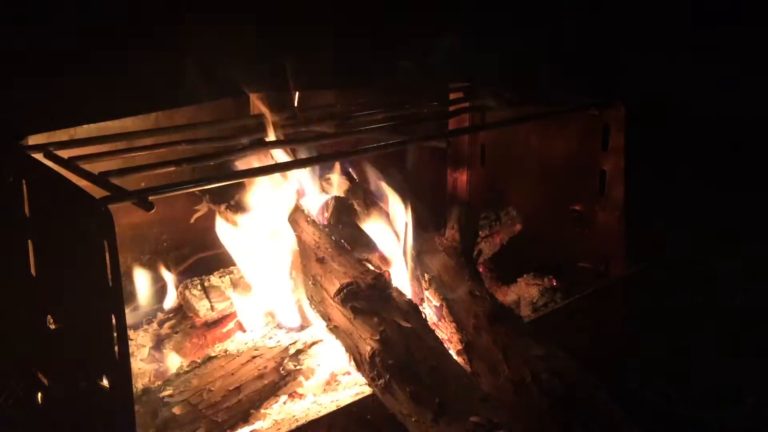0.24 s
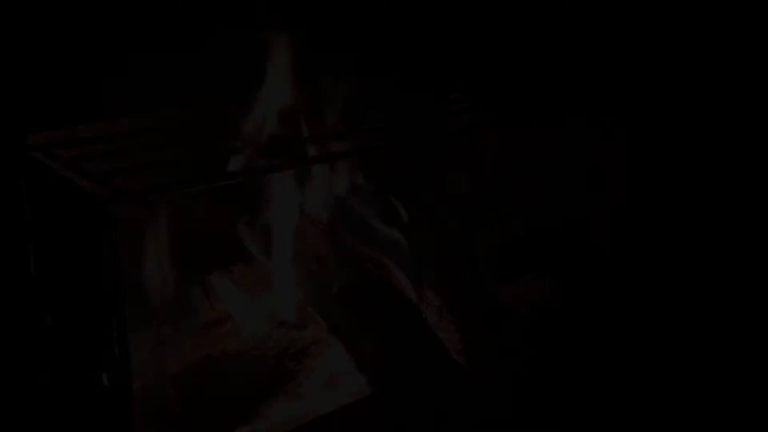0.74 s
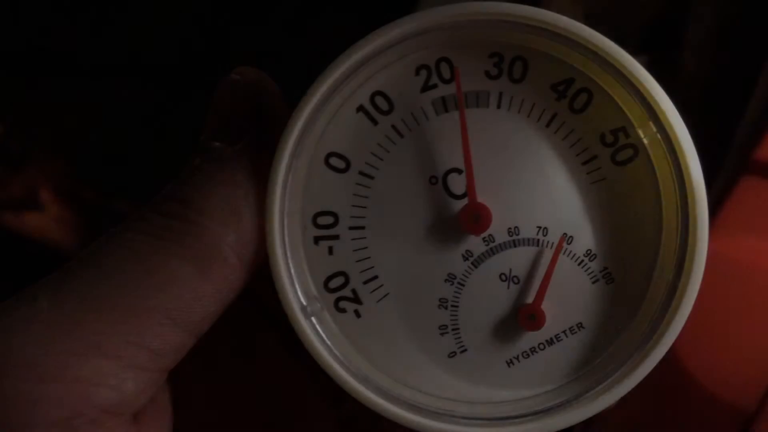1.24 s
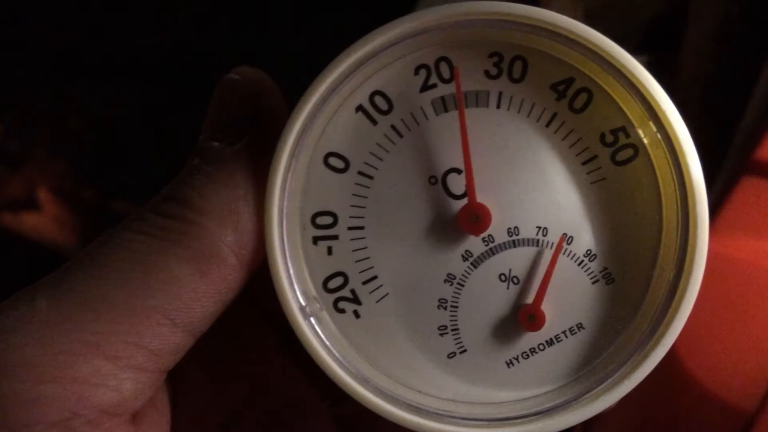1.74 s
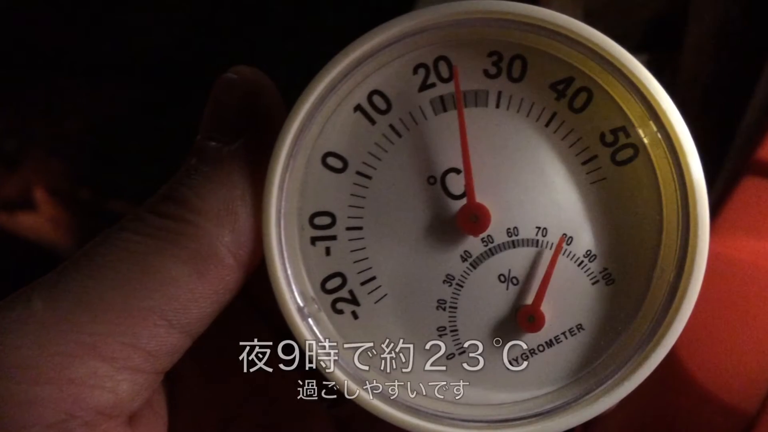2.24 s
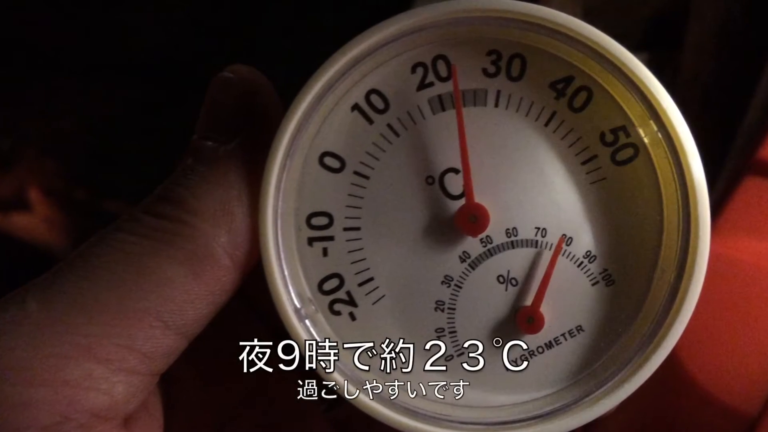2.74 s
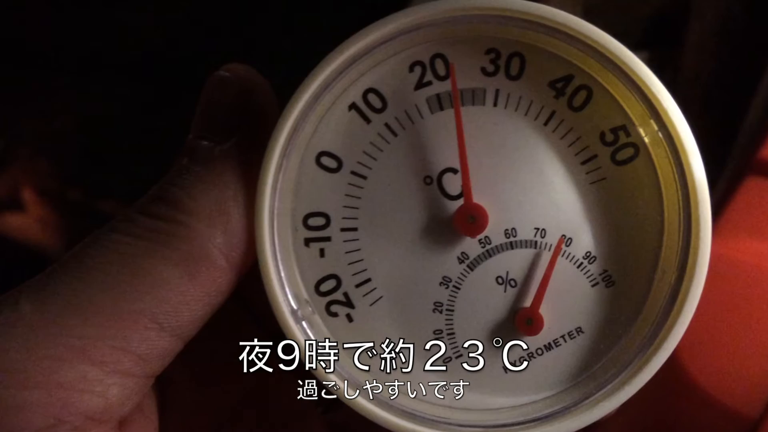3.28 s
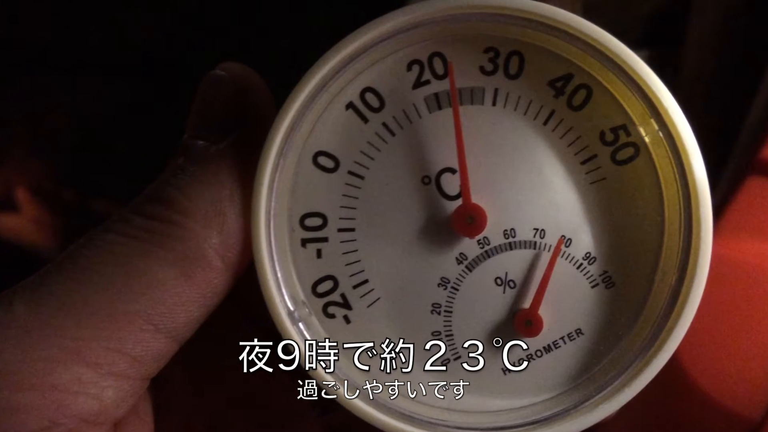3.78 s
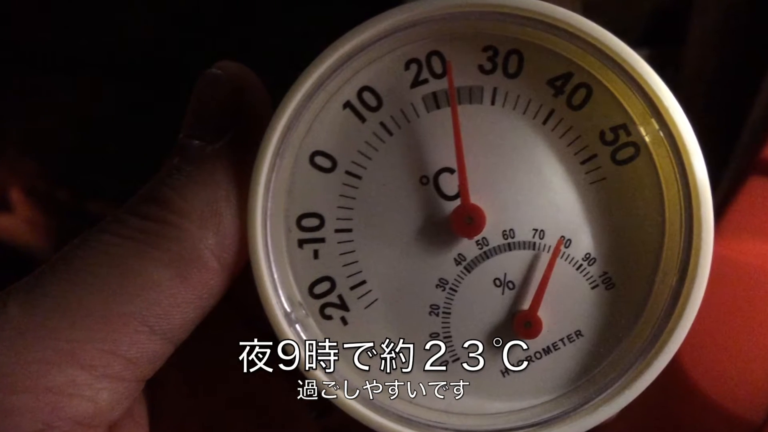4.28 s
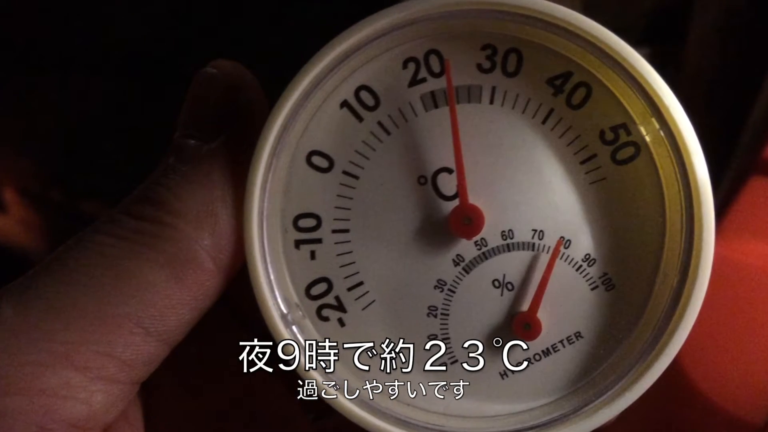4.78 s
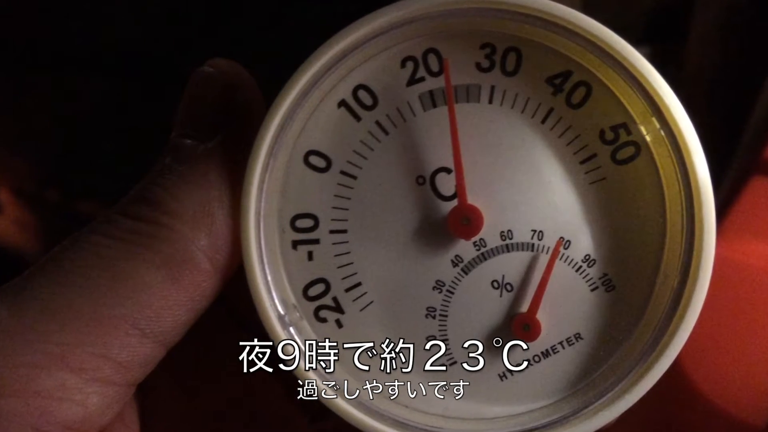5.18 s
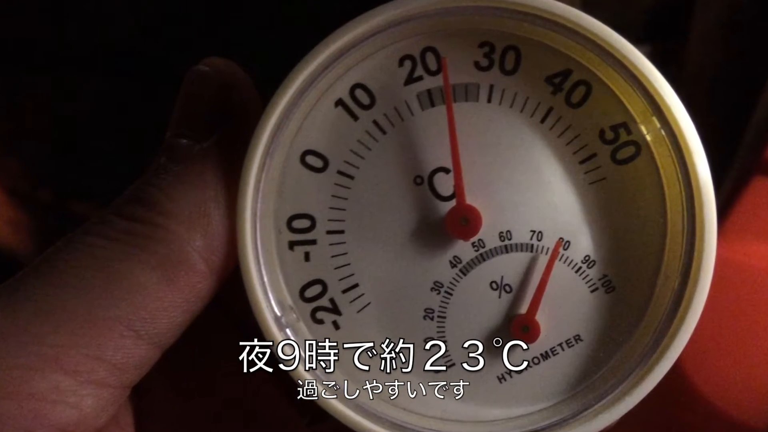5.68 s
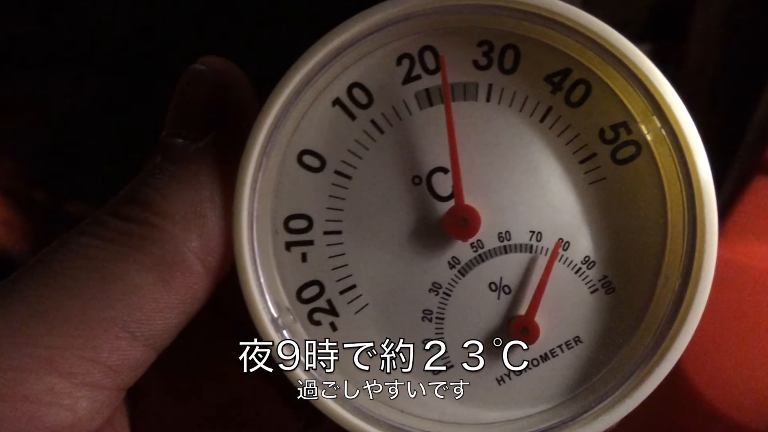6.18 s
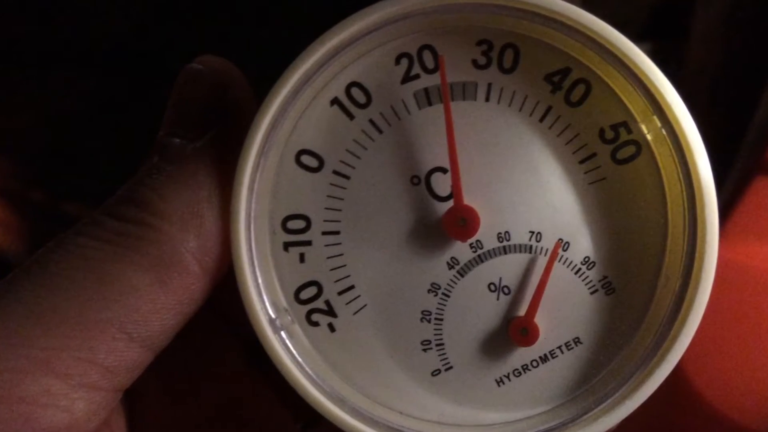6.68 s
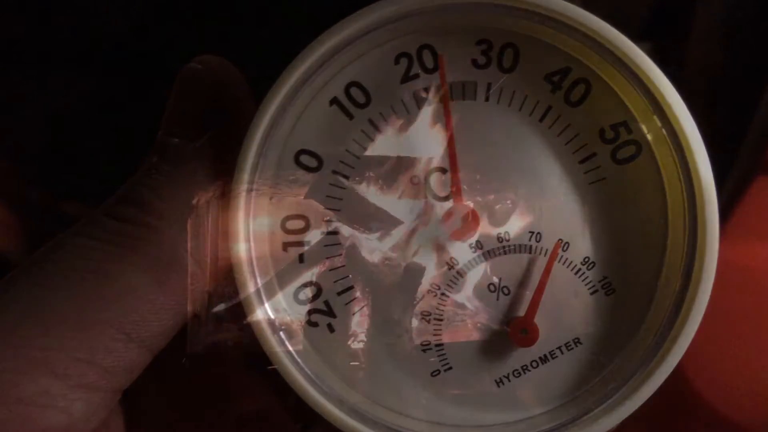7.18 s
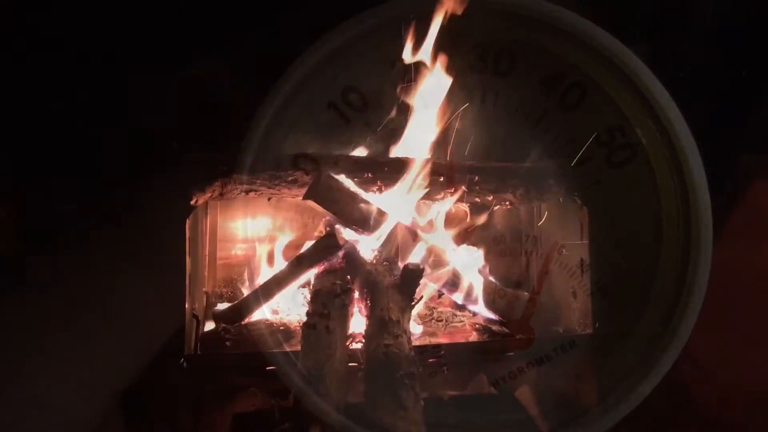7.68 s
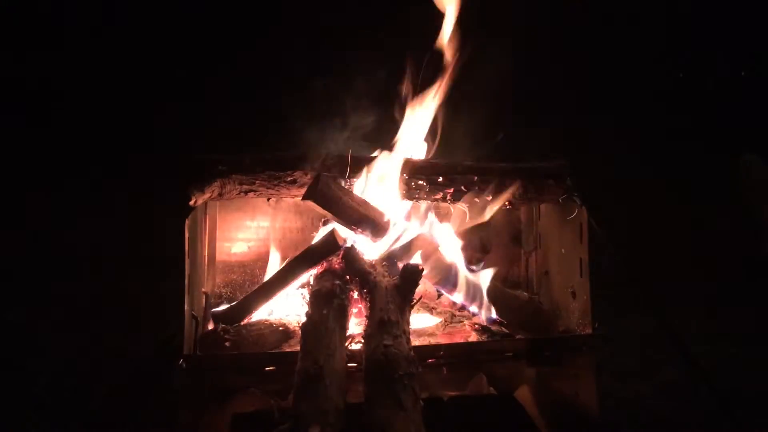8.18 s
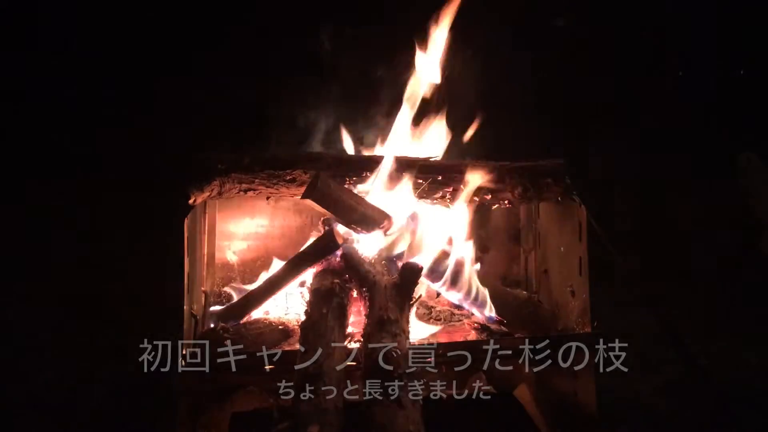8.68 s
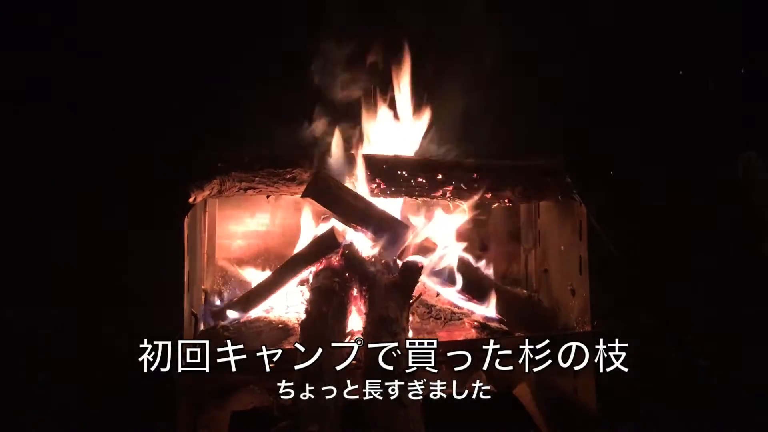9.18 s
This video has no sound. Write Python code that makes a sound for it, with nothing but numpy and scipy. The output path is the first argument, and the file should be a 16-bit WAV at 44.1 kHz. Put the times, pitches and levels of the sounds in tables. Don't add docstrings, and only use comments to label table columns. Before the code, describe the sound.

Night crickets trill in a dense high chorus with a raspy bush cricket while a wood fire rumbles softly, ticks and pops sharply in a metal grill.

```python
import sys
import numpy as np
from scipy import signal
from scipy.fft import rfft, irfft, next_fast_len
from scipy.io import wavfile
from scipy.ndimage import map_coordinates

SR = 44100
rng = np.random.default_rng(int(sys.argv[2]) if len(sys.argv) > 2 else 0)


def ratio(d):
    e = np.asarray(d, float) / 20
    return 10 ** e


def file_out(sig):
    cols = np.atleast_2d(sig).T
    lim = np.clip(cols, -1, 1)
    pcm = np.round(lim * 32767).astype(np.int16)
    wavfile.write(sys.argv[1], SR, pcm)


N = 415863
T = np.arange(N) / SR

# freq_hz, density_db_per_hz
AIR_SPECTRUM = [(1300, -23), (1750, 0.5), (2700, -12), (3700, 6), (4300, -1), (5550, -4), (6500, -9),
                (9000, -9.5), (12000, -8.5), (15500, -8.5)]
AIR_DB = -66.5

# freq_hz, density_db_per_hz
TRAFFIC_SPECTRUM = [(150, -37), (250, 0), (339, -9), (404, -4.5), (547, -2), (843, -4), (1020, 1),
                    (1360, -2), (1850, -15.5), (2600, -11.5), (3380, -27), (5720, -120)]
# time_s, peak_spacing_hz, echo_share_0_to_1
GROUND_ECHO = [(0, 305, 0), (1, 310, 0.03), (2, 353, .5), (3.2, 391, 0.22), (4, 468, 0.4), (6.5, 460, 0.26),
               (7.5, 486, 0.23), (8, 594, 0), (9.43, 590, 0)]
TRAFFIC_DB = -61.5

# time_s, level_db
FLAME_LEVEL = [(0.0, -56.5), (1.55, -59.5), (3.28, -57), (3.57, -58.5), (4.67, -58), (5.51, -56),
               (6.8, -59.5), (7.09, -55.5), (8.17, -59.5), (9.43, -60)]
# freq_hz, density_db_per_hz
FLAME_SPECTRUM = [(13, -49), (22, -30), (40, -7), (64, -0.5), (125, -2), (208, -6), (246, -12.5),
                  (333, -17), (400, -22), (520, -33), (880, -120)]

# time_s, level_db
CHORUS_LEVEL = [(0.0, -43.5), (1.02, -42.5), (1.21, -43.5), (1.86, -41), (1.94, -47), (2.1, -41.5),
                (3.28, -43), (3.47, -39.5), (3.67, -46.5), (3.86, -41), (4.59, -43.5), (4.67, -44),
                (5.62, -43.5), (7.17, -42), (7.6, -45.5), (7.8, -48), (8.28, -52), (9.43, -49.5)]
# pitch_hz, level_db, strokes_per_s, trills_per_s
FAR_SINGERS = [(4990, 1.5, 31.5, 3.1), (4955, 1, 30.2, 2.1), (4944, -0.5, 29.1, 3.3), (4960, -8.5, 40, 1.8),
               (4833, -4, 28.3, 2.45), (4970, -4, 30, 2.5), (4783, -5, 27.6, 2.2), (4714, -11, 29.7, 1.7),
               (4595, -14.5, 30, 2.7)]
# freq_hz, density_db_per_hz
MASS_SPECTRUM = [(4200, -32), (4500, -15), (4750, -1), (4900, 3), (5010, 4), (5120, -1), (5300, -13),
                 (5420, -40)]

# time_s, rasp_db, lower_re_upper_wing_db
RASP_LEVEL = [(0.0, -49, -14), (0.84, -52, -11), (1.3, -55.5, -7), (2.47, -56.5, -2.5), (5.41, -55.5, -4.5),
              (5.65, -51.5, -6), (6.04, -53, -11.5), (6.62, -49.5, -13), (7.0, -49.5, -18),
              (7.64, -50.5, -8.5), (7.85, -60, -9), (8.1, -97, 0.1), (9.43, -85, 0.1)]
# time_s, lag_ms
CYCLE_LAG = [(0, 40), (1.01, 33), (1.02, 20.5), (1.35, 17), (2.3, 12.5), (3.6, 4.5), (4.6, 6), (5.74, 2.5),
             (6.5, 5.5), (6.93, 3.5), (7.33, 6), (8, 17)]
# offset_ms, half_length_ms, level_db
RASP_STROKES = [
    (0, 3.4, 0),
    (13, 4.0, -16),
    (26, 2.3, -3.5),
    (39, 4.0, -18),
    (57, 4.5, -12),
    (67, 4.0, -14),
]
# freq_hz, density_db_per_hz
UPPER_WING = [(5600, -39), (6200, -4), (6800, 2), (7500, 5.5), (8000, -4.5), (8600, -11)]
# freq_hz, density_db_per_hz
LOWER_WING = [(5300, -24), (5550, -0.5), (5750, -3.5), (6000, -2.5), (6500, -12), (6900, -23)]
# freq_hz, density_db_per_hz
SIZZLE_SPECTRUM = [(2400, -10.5), (3000, -7), (3800, 1), (4300, -5), (5300, 0), (7000, 1), (8600, -2),
                   (10500, -5.5), (12500, -8.5), (14000, -15), (15500, -13)]
RASP_CYCLE_S = .0797
FILE_HZ, FILE_SAG_HZ_PER_MS, FILE_DB, ONSET_SHARE = 7060, 190, -5, 0.65
SIZZLE_DB, SIZZLE_FOLLOWS, SIZZLE_FAR_DB = -57, 0.1, -70.5
LEAVE_S, ARRIVE_S = 7.53, 7.88

# start_s, length_s, peak_db
NEAR_CHIRPS = [(.009, 0.13, -36), (.223, 0.1, -26), (.347, 0.18, -31), (.677, 0.081, -22.5),
               (.809, 0.091, -33), (1.233, 0.28, -34), (1.763, .098, -39), (2.026, 0.17, -25.5),
               (2.226, .225, -33), (2.578, 0.054, -28.5), (2.706, 0.31, -30.5), (3.233, 0.099, -27),
               (3.369, 0.24, -26), (3.797, 0.29, -33), (4.208, 0.34, -28.5), (4.803, 0.26, -28),
               (5.175, .163, -32.5), (5.404, 0.31, -27.5), (5.838, 0.16, -27), (6.157, .304, -34.5),
               (6.506, 0.27, -34), (6.966, .1, -28.5), (7.191, 0.1, -28), (7.495, .166, -28),
               (7.695, 0.057, -30)]
# start_s, length_s, peak_db
LONE_CHIRPS = [
    (7.840, .325, -32),
    (8.314, .228, -29.5),
    (8.696, .26, -30),
    (9.101, .324, -32),
]
STROKE_GAP_S = .033
WING_HZ, WARM_HZ, WARM_DB, WARM_STROKES = 5010, 150, 9.0, 1.1

# time_s, crack_db, knock_db, snap_db, spit_db
WOOD_POPS = [(0.5307, -42.5, -68, -44, -29.5), (0.5365, -50, -62, -46, -40), (0.5409, -46, -55, -25, -30),
             (3.1407, -56, -70, -44, -56), (3.317, -31, -53, -34, -50), (3.775, -32, -69, -52, -44),
             (4.0465, -34, -51.5, -38.5, -57), (4.844, -38, -52.5, -45, -58),
             (5.3667, -7.5, -27, -16.5, -26.5), (6.133, -34, -58, -32.5, -35),
             (7.1916, -18.5, -36.5, -34, -27), (7.4812, -23, -28, -22, -28.5)]
# time_s, thud_db
LOG_THUDS = [
    (3.1399, -49.5),
    (3.3172, -59),
    (5.3671, -37.5),
    (7.1912, -35.5),
    (7.4812, -39.5),
]
# time_s, crack_db, spit_db
EMBER_TICKS = [(0.043, -50, -44.5), (0.436, -47, -41), (0.9707, -43, -56), (1.4604, -50, -47),
               (1.5484, -44, -48), (1.73, -47, -48), (2.2637, -51, -44), (2.4249, -43, -49),
               (2.5504, -52, -52), (3.4301, -42, -59), (3.4664, -49, -44), (3.5558, -38, -48.5),
               (3.971, -33, -61), (4.0956, -44, -56), (4.149, -35, -52), (4.2972, -38, -45),
               (4.4094, -40, -55), (4.6924, -39, -58), (5.026, -51.5, -49), (5.0815, -39, -50),
               (5.2051, -49, -46), (5.9884, -48, -46), (6.244, -51, -48), (6.4063, -48, -52),
               (6.4717, -52, -42), (6.6364, -55, -48), (7.0145, -52, -48), (8.3434, -59, -64),
               (8.7394, -59, -50.5), (9.2664, -58, -59)]
# low_hz, high_hz, level_db, t60_s, front_share, rattle_delay_ms
BURST_BANDS = [(2450, 4340, -17, 0.017, 12.5, 1.3), (107, 470, -4.5, 0.044, 21, 1.2),
               (710, 1580, -1.5, 0.022, -13, 1.1), (5200, 8000, 2, 0.012, -1.5, 1.3),
               (9000, 14200, 2, 0.0083, 3.5, 1.3)]
FAINT_PER_S, FAINT_DB = 30, -70
GRILL_HZ, GRILL_DB, GRILL_T60_S = 2110, -11, 0.019


def rms_one(x):
    return x / np.sqrt(np.mean(x ** 2) + 1e-20)


def in_time(rows):
    time_s, *columns = np.transpose(rows)
    return [np.interp(T, time_s, column) for column in columns]


def drift(rate_hz):
    coarse_s = T[::64]
    knots = rng.standard_normal(400)
    return np.interp(T, coarse_s, map_coordinates(knots, [coarse_s * rate_hz % 399], order=3))


def noise(spectrum):
    freq_hz, level_db = np.transpose(spectrum)
    size = next_fast_len(N)
    grid_hz = np.maximum(np.arange(size // 2 + 1) * SR / size, 1)
    colour = ratio(np.interp(np.log(grid_hz), np.log(freq_hz), level_db, -90, -90))
    return rms_one(irfft(rfft(rng.standard_normal(size)) * colour, size)[:N])


def patchy(x, sway_db, rate_hz):
    edges_hz = np.geomspace(2200, 16000, 9)
    total = np.zeros(N)
    for k, pair_hz in enumerate(zip(edges_hz, edges_hz[1:])):
        band = signal.butter(2, pair_hz, "band", fs=SR, output="sos")
        total += ratio(sway_db * drift(rate_hz)) * signal.sosfilt(band, x) * (-1) ** k
    return rms_one(total)


def night_air():
    return ratio(AIR_DB) * noise(AIR_SPECTRUM)


def traffic():
    spacing_hz, share = in_time(GROUND_ECHO)
    direct = noise(TRAFFIC_SPECTRUM)
    echo = map_coordinates(direct, [np.arange(N) - SR / spacing_hz], order=3, mode="wrap")
    return ratio(TRAFFIC_DB) * (direct + share * echo) / np.sqrt(1 + share ** 2)


def far_crickets(fall_hz=160, sway_db=-0.5):
    chorus_db, = in_time(CHORUS_LEVEL)
    singers = np.zeros(N)
    for pitch_hz, level_db, strokes_per_s, trills_per_s in FAR_SINGERS:
        beat = (T * strokes_per_s + rng.random() + .4 * drift(2.5)) % 1
        trill = T * trills_per_s + rng.random() + 0.13 * drift(0.792)
        singing = np.clip(1.96 + 2.9 * np.sin(2 * np.pi * trill), .3, 1)
        wing = np.sin(np.pi * np.clip(beat / 0.7, 0, 1))
        tone_hz = pitch_hz + fall_hz * (.3 - beat) + 18 * drift(6.0)
        tone = np.sin(2 * np.pi * np.cumsum(tone_hz) / SR)
        singers += ratio(level_db + sway_db * drift(15.0)) * singing * wing * tone
    scatter = rng.standard_normal(4000) * ratio(-60 * np.arange(4000) / SR / 0.16)
    smeared = rms_one(signal.fftconvolve(singers, scatter)[:N])
    mix = 0.51 * rms_one(singers) + .5 * smeared + 0.86 * noise(MASS_SPECTRUM)
    return ratio(chorus_db - 0.5) * rms_one(mix)


def bush_cricket(uneven_db=2.0, between_db=-14, sizzle_depth=0.52):
    upper_db, turn_db = in_time(RASP_LEVEL)
    lower_db = upper_db + turn_db
    sizzle_db = np.interp(T, [LEAVE_S, ARRIVE_S], [SIZZLE_DB, SIZZLE_FAR_DB])
    sizzle_db = sizzle_db + SIZZLE_FOLLOWS * np.minimum(turn_db + 6.5, 0)
    lag_ms, = in_time(CYCLE_LAG)
    cycles = (T - lag_ms / 1000) / RASP_CYCLE_S + 1
    force, teeth = ratio(between_db), 0
    for offset_ms, half_ms, stroke_db in RASP_STROKES:
        place = cycles - offset_ms / 1000 / RASP_CYCLE_S + .5
        away_ms = (place % 1 - .5) * RASP_CYCLE_S * 1000
        strength = ratio(stroke_db + uneven_db * rng.standard_normal(200))[place.astype(int)]
        width_ms = half_ms * np.where(away_ms < -1, ONSET_SHARE, 1)
        stroke = strength * np.exp(-.5 * (away_ms / width_ms) ** 2)
        tooth_hz = FILE_HZ - FILE_SAG_HZ_PER_MS * away_ms + 250 * drift(40.0)
        force = force + stroke
        teeth = teeth + stroke * np.sin(2 * np.pi * np.cumsum(tooth_hz) / SR)
    scrape = rms_one(force)
    upper = ratio(upper_db - 0.5) * (scrape * noise(UPPER_WING) + ratio(FILE_DB) * rms_one(teeth))
    late_scrape = np.roll(scrape, int(0.004 * SR))
    lower = ratio(lower_db + 3.5) * late_scrape * noise(LOWER_WING)
    airy = patchy(noise(SIZZLE_SPECTRUM), sway_db=1.88, rate_hz=16.0)
    return upper + lower + ratio(sizzle_db + 4) * rms_one(force ** sizzle_depth) * airy


def chirps(rows, uneven_db, uneven_hz):
    luck = rng.standard_normal((len(rows), 2, 16))
    strokes = []
    for (start_s, length_s, peak_db), (strong, high) in zip(rows, luck):
        count = int(round(length_s / STROKE_GAP_S)) + 1
        for k, at_s in enumerate(np.linspace(start_s, start_s + length_s, count)):
            cold = np.exp(-k / WARM_STROKES)
            level_db = peak_db - WARM_DB * cold + uneven_db * strong[k]
            pitch_hz = WING_HZ - WARM_HZ * cold + uneven_hz * high[k]
            strokes.append((at_s, level_db, pitch_hz))
    return strokes


def wing_strokes(strokes, stroke_s, fall_hz):
    t = np.arange(int(stroke_s * SR)) / SR
    swell = np.sin(np.pi * (t / stroke_s) ** 0.65) ** 0.71
    out = np.zeros(N + len(t))
    for at_s, level_db, pitch_hz in strokes:
        i = int(at_s * SR)
        turns = (pitch_hz + fall_hz * (.5 - .5 * t / stroke_s)) * t
        out[i:i + len(t)] += ratio(level_db) * swell * np.sin(2 * np.pi * turns)
    echoes = 0
    for lag_s, echo_db in [(.0061, -18), (.0143, -18), (.023, -16)]:
        echoes = echoes + ratio(echo_db) * np.roll(out, int(lag_s * SR))
    return (out + echoes)[:N]


def near_crickets():
    many = wing_strokes(chirps(NEAR_CHIRPS, uneven_db=3.0, uneven_hz=44.6), stroke_s=0.016, fall_hz=78.5)
    lone = wing_strokes(chirps(LONE_CHIRPS, uneven_db=0.7, uneven_hz=18.5), stroke_s=0.017, fall_hz=60)
    return ratio(-9.5) * many + ratio(-7.0) * lone


def flames():
    rumble_db, = in_time(FLAME_LEVEL)
    return ratio(rumble_db + 1.75 * drift(5.0)) * noise(FLAME_SPECTRUM)


def burst_rows():
    off_db = -120
    rows = [(s, crack_db, off_db, *rest_db) for s, crack_db, *rest_db in WOOD_POPS]
    rows += [(s, off_db, thud_db, off_db, off_db, off_db) for s, thud_db in LOG_THUDS]
    rows += [(s, crack_db, off_db, off_db, spit_db - 1, spit_db) for s, crack_db, spit_db in EMBER_TICKS]
    for s, a, b in rng.random((FAINT_PER_S * N // SR, 3)):
        crack_db, snap_db, spit_db = FAINT_DB + 8 + 12 * a, FAINT_DB + 9 * b, FAINT_DB + 4 * (a + b)
        rows.append((s * T[-1], crack_db, off_db, off_db, snap_db, spit_db))
    return np.array(rows)


def fire_pops(front_ms=.8):
    rows = burst_rows()
    at = (rows[:, 0] * SR).astype(int)
    front_lag = int(front_ms * SR / 1000)
    out = np.zeros(N)
    for k, (low_hz, high_hz, band_db, t60_s, front_share, late_ms) in enumerate(BURST_BANDS):
        front = np.zeros(N)
        np.add.at(front, at, ratio(rows[:, 1 + k] + band_db))
        late = np.roll(front, int(late_ms * SR / 1000))
        dying = signal.lfilter([1], [1, -ratio(-60 / (t60_s * SR))], late + 1e-18)
        rattle = rng.choice([-1, 1], N) * dying
        band = signal.butter(2, [low_hz, high_hz], "band", fs=SR, output="sos")
        burst = signal.sosfilt(band, front_share * np.roll(front, front_lag) + rattle)
        out += burst * np.sqrt(SR / 2 / (high_hz - low_hz))
    snaps = np.zeros(N)
    np.add.at(snaps, at + front_lag, ratio(rows[:, 4] + GRILL_DB))
    r, w = ratio(-60 / (GRILL_T60_S * SR)), 2 * np.pi * GRILL_HZ / SR
    ring = signal.lfilter([0, np.sin(w)], [1, -2 * r * np.cos(w), r * r], snaps + 1e-18)
    return out + ring


def scene():
    background = night_air() + traffic()
    insects = far_crickets() + bush_cricket() + near_crickets()
    fire = flames() + fire_pops()
    return (background + insects + fire)[None]


def band_limit(x):
    return signal.sosfilt(signal.butter(12, 16250, fs=SR, output="sos"), x)


def record(dry):
    steep = signal.cheby2(12, 24, 15330, fs=SR, output="sos")
    cut = signal.sosfilt(steep, dry)
    return band_limit(cut)


dry = scene()
out = record(dry)
file_out(out)
```